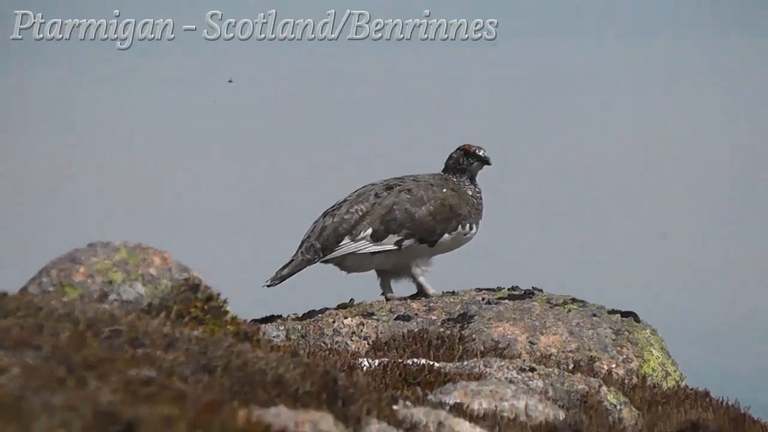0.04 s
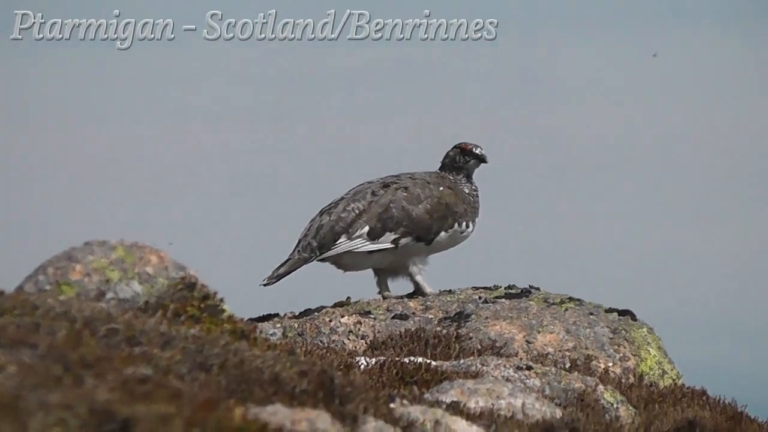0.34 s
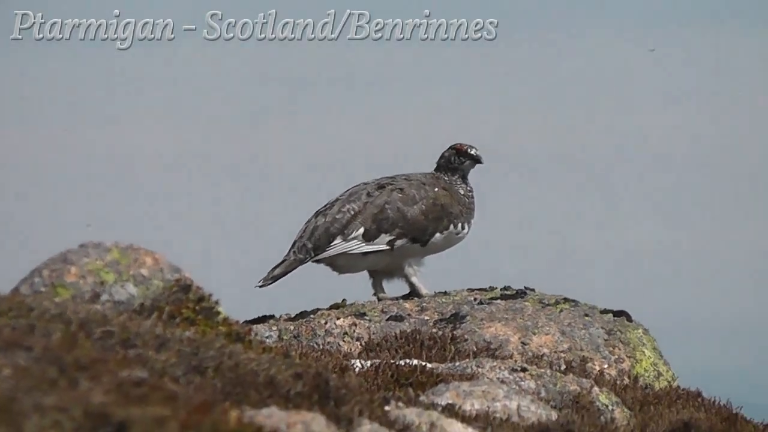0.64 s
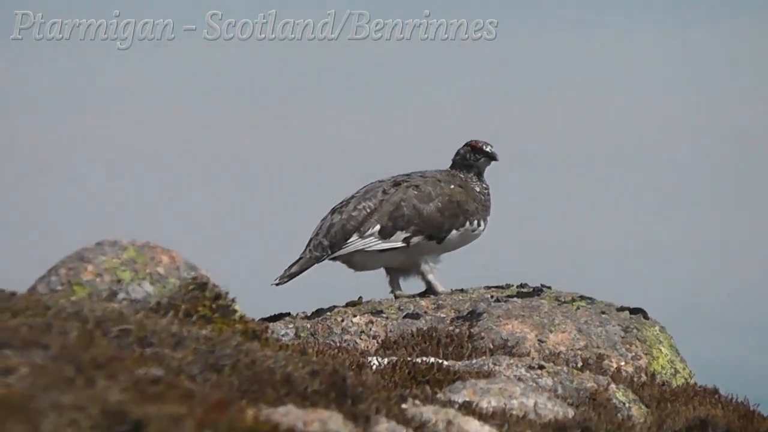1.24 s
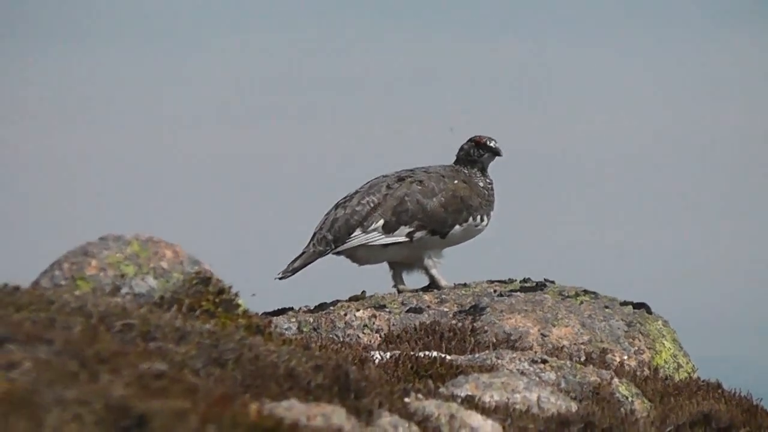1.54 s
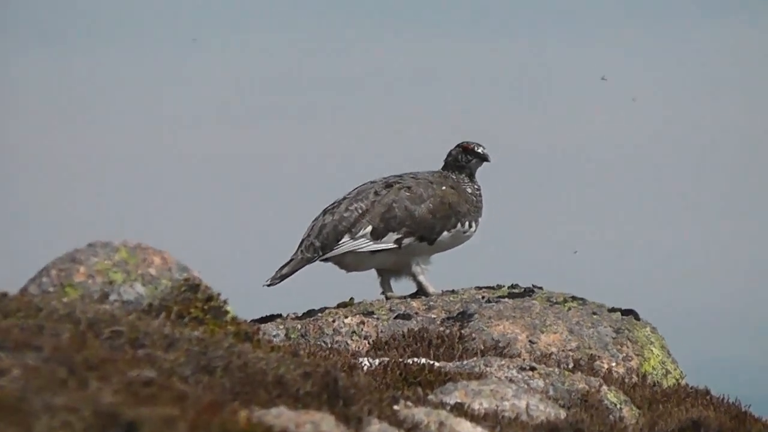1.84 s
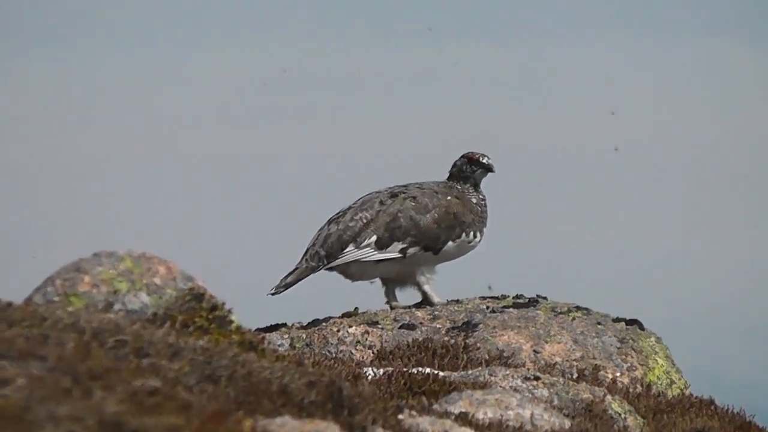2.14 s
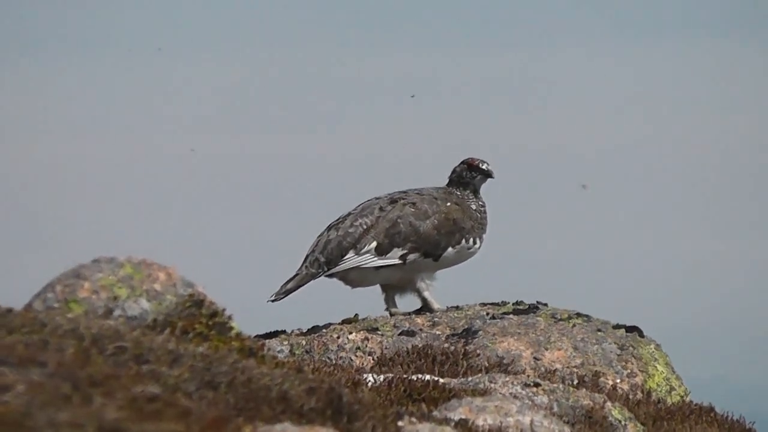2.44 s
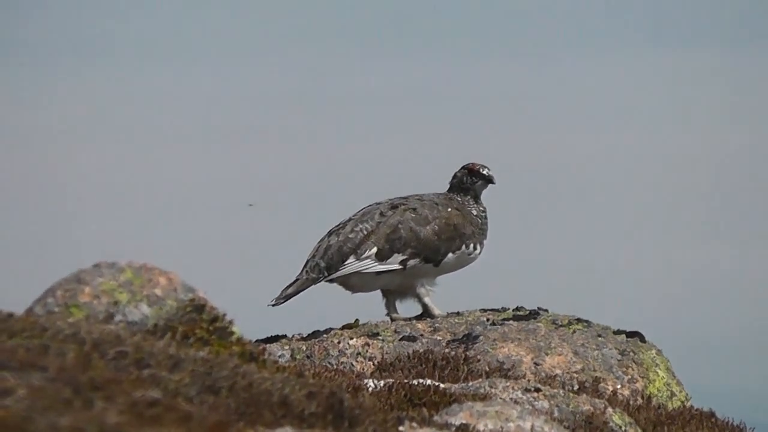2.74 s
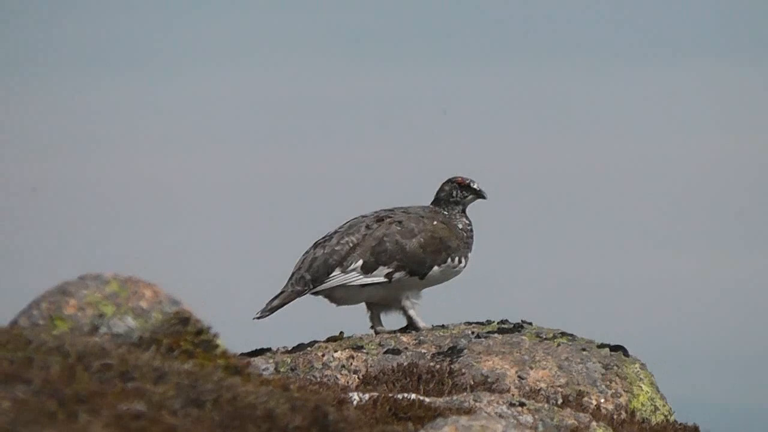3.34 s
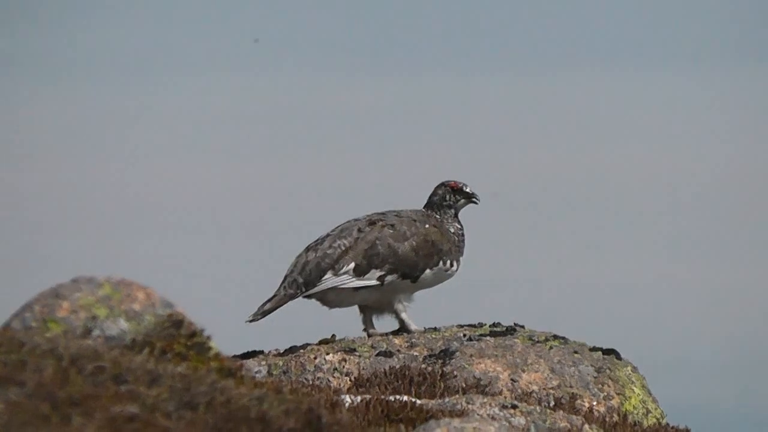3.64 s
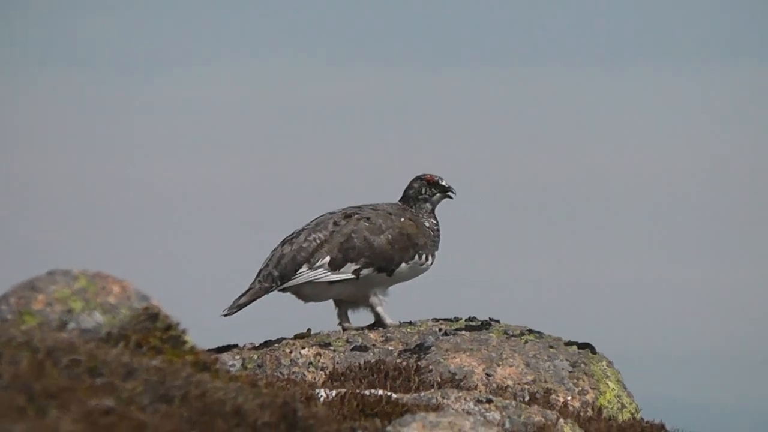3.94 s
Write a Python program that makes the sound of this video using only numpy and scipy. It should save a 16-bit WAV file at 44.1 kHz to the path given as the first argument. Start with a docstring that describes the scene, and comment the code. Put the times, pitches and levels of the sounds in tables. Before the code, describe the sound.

Wind buffets a close camera microphone on an open mountainside. A light puff comes and fades, then a gust builds into a low, fluttering rumble with soft thumps. Faint rushing air, hiss and camera motor buzz lie underneath.

```python
"""Wind buffets a camera's stereo microphone on an open mountainside: two light puffs, then a gust that
builds to the end. Turbulence right on the ports rumbles, flutters and tears; single eddies thump them.
Farther off, air rushes softly over the slope. Close up are the camera's own hiss and whirr,
spells of faint motor buzz and one small tick."""
import sys
import numpy as np
from scipy import signal
from scipy.fft import rfft, irfft, next_fast_len
from scipy.io import wavfile
from scipy.ndimage import uniform_filter1d, map_coordinates

SR = 44100
rng = np.random.default_rng(int(sys.argv[2]) if len(sys.argv) > 2 else 0)


def to_wav(sig):
    """Store sig (one row per channel, or 1-D mono) as 16-bit WAV at the path in sys.argv[1].

    Samples outside -1..1 are clipped; the rate is SR.
    """
    pcm = np.clip(np.atleast_2d(sig), -1, 1) * 32767
    pcm = np.round(pcm).astype(np.int16)
    wavfile.write(sys.argv[1], SR, pcm.T)  # frames by channels


N = 176400


def amp(db):
    """Decibels to gain."""
    return 10 ** (np.asarray(db) / 20)


def unit(x):
    """Scale to rms 1."""
    return x / np.sqrt(np.mean(x ** 2) + 1e-20)


def along(points, hz):
    """Read (frequency [Hz], value) points on a log axis."""
    freqs, values = np.transpose(points)
    return np.interp(np.log(hz + 1), np.log(freqs + 1), values)


def colour(points):
    """Gain against frequency, from (frequency [Hz], level [dB]) points."""
    return lambda hz: amp(along(points, hz))


def clock():
    """The time of each sample in seconds."""
    return np.arange(N) / SR


def curve(rows):
    """(time [s], value) points as one value per sample."""
    return np.interp(clock(), *np.transpose(rows))


def wobble(rate):
    """A smooth random curve, rate knots a second."""
    return map_coordinates(rng.standard_normal(int(N * rate / SR) + 4), [clock() * rate])


def filtered(x, response):
    """Shape x by a gain against frequency."""
    size = next_fast_len(N + SR // 2)
    return irfft(rfft(x, size) * response(np.fft.rfftfreq(size, 1 / SR)), size)[..., :N]


def rush(gain, alike, patchy_db=0):
    """Coloured stereo noise of rms 1 in random patches; alike is (frequency [Hz], left-right likeness)."""
    spectrogram = signal.stft(rng.standard_normal((2, N)), nperseg=512)[2]
    patches = uniform_filter1d(rng.standard_normal(spectrogram.shape[1:]), size=4, axis=0)
    patches = unit(uniform_filter1d(patches, size=20, axis=1))
    pair = signal.istft(spectrogram * amp(patchy_db * patches), nperseg=512)[1][:, :N]
    spread = lambda hz: np.arccos(np.clip(along(alike, hz), -1, 1)) / 2
    mid, side = filtered(pair, lambda hz: gain(hz) * np.array([np.cos(spread(hz)), np.sin(spread(hz))]))
    return unit(np.array([mid + side, mid - side]))


def steadied(x, size=1800):
    """Even out the chance swells of noise over size samples, so that the wind sets them."""
    power = uniform_filter1d(np.mean(x ** 2, axis=0), size)
    return x / np.sqrt(np.abs(power) + 1e-6)


def buffeting():
    """Turbulence on the ports: a rumble that rises in pitch with the wind, flutter and tearing in gusts."""
    # wind strength at the microphone (time [s], level [dB])
    wind_level = [(0.0, -77), (0.13, -62.5), (0.15, -65), (0.69, -67.5), (0.71, -64), (0.77, -66),
                  (0.9, -49), (0.99, -54.5), (1.24, -55), (1.68, -73.5), (1.88, -64), (1.97, -69),
                  (2.03, -56.5), (2.06, -65), (2.26, -47.5), (2.29, -42), (2.54, -60.5), (2.67, -38.5),
                  (2.7, -49.5), (2.74, -39), (2.82, -45.5), (2.94, -42), (2.97, -44), (3.06, -29.5),
                  (3.13, -34.5), (3.17, -34), (3.21, -42.5), (3.24, -31.5), (3.35, -42.5), (3.38, -35),
                  (3.43, -44.5), (3.52, -37.5), (3.58, -32), (3.65, -38.5), (3.72, -32), (3.74, -42),
                  (3.78, -35.5), (3.9, -37), (3.92, -32.5), (4.0, -37)]
    # rumble in strong wind, and the deeper one of slow, light wind (frequency [Hz], level [dB])
    strong_spectrum = [(20, -43), (35, -29), (50, -11.5), (65, -3), (95, 1), (150, -5.5), (210, -13.5),
                       (300, -29), (450, -43.5), (900, -73), (2000, -100)]
    light_spectrum = [(20, -24.5), (35, -8), (55, 1.5), (100, 0), (160, -8.5), (220, -19), (300, -23.5),
                      (600, -59), (2000, -100)]
    # flutter between the ports, and brighter tearing (frequency [Hz], level [dB])
    flutter_spectrum = [(40, -28), (90, -7.5), (160, 4), (240, -1.5), (320, -11.5), (430, -24.5),
                        (700, -44), (1200, -65), (3000, -100)]
    tear_spectrum = [(60, -13), (180, -2.5), (300, -4.5), (400, -4), (520, -10.5), (700, -17),
                     (1200, -36.5), (2000, -40), (4000, -86)]
    # tearing in the hardest gusts (time [s], level [dB])
    tear_level = [(2.2, -91), (2.95, -64), (3.06, -54.5), (3.13, -52), (3.19, -67), (3.25, -52),
                  (3.32, -75), (3.53, -70), (3.565, -50), (3.595, -39.5), (3.63, -57), (3.69, -56),
                  (3.725, -57), (3.77, -61), (3.85, -58), (3.89, -44), (3.945, -56), (3.972, -40.5),
                  (4, -65)]
    light_below_db, blend_db, gust_db = -44.5, 1.5, -36
    wind_db = curve(wind_level)
    strong_share = (1 + np.tanh((wind_db - light_below_db) / blend_db)) / 2
    rumble_alike = [(60, 1.0), (250, 0.48)]
    strong = np.sqrt(strong_share) * rush(colour(strong_spectrum), rumble_alike)
    light = np.sqrt(1 - strong_share) * rush(colour(light_spectrum), rumble_alike)
    rumble = steadied(strong + light) * amp(wind_db - 1.4 + 1.77 * wobble(35))
    flutter_db = gust_db - 9 + 1.3 * (wind_db - gust_db)  # grows faster than the wind
    flutter = steadied(rush(colour(flutter_spectrum), alike=[(100, -0.3), (250, -0.25), (500, -0.4)]))
    flutter *= amp(flutter_db + 2 * wobble(45))
    tear = rush(colour(tear_spectrum), alike=[(200, -0.2), (500, -0.92)])
    tear *= amp(curve(tear_level) + 1.7 * wobble(76))
    return rumble + flutter + tear


def air():
    """A soft, wide rush of wind over heather and rock; faint hollow tones come out as it swells."""
    # swell of the air over the slope (time [s], level [dB])
    air_level = [(0, -61), (.3, -62.5), (.65, -63.5), (1.05, -60.5), (1.4, -63.5), (1.65, -61),
                 (2.1, -64.5), (2.8, -63.5), (3.3, -64.5), (4, -62)]
    # its colour (frequency [Hz], level [dB])
    air_spectrum = [(20, -3.5), (35, -4.5), (60, 5), (130, 0), (250, -3), (500, -4.5), (700, -7.5),
                    (920, -14), (1150, -11), (1350, -13.5), (1600, -14.5), (2300, -29.5), (3000, -28),
                    (6000, -50)]
    # its stereo image (frequency [Hz], left-right likeness [-1 to 1])
    air_alike = [(60, -0.55), (230, -0.45), (400, -0.43), (800, -0.13), (1500, -0.32), (3000, 0.34)]
    # hollow tones (centre [Hz], half-width [Hz], level against the air [dB])
    hollows = [(545, 92, -14), (916, 98, -13)]
    hollow_swing_db = 2.4
    air_db = curve(air_level)
    out = rush(colour(air_spectrum), air_alike, patchy_db=1.9)
    for hz, width, db in hollows:
        band = rush(lambda f: 1 / (1 + ((f - hz) / width) ** 2), alike=[(700, -0.073)])
        swell = unit(amp(air_db - air_db.mean() + hollow_swing_db * wobble(9)))
        out += amp(db) * swell * band
    return amp(air_db + 0.49 * wobble(8)) * out


def camera_whirr():
    """A steady whirr in the resonances of the body that holds the microphone."""
    # body resonances (centre [Hz], half-width [Hz], relative level [dB])
    modes = [(1318, 62, 4), (1865, 69, 4), (2110, 175, 0), (2270, 180, 0), (3190, 33, -5.5),
             (3580, 150, -5), (4410, 152, -0.5), (4877, 115, 1), (5350, 540, -9.5), (6080, 194, -3.5),
             (6980, 550, -13)]
    whirr_db = -71.5
    power = lambda f: sum(amp(2 * db) / (1 + ((f - hz) / width) ** 2) ** 2 for hz, width, db in modes)
    level = amp(whirr_db + 0.34 * wobble(12))
    alike = [(1300, 0.52), (2300, 0.84), (4400, 0.98)]
    return level * rush(lambda f: np.sqrt(power(f)), alike, patchy_db=1.2)


def camera_hiss():
    """The noise floor: broad microphone hiss, an upper-middle band of it and a thin electronic whine."""
    # broad hiss, and the upper-middle band that dips as the gust builds (time [s], level [dB])
    broad_level = [(0, -72), (1, -72), (2, -72.5), (2.8, -72.5), (3.3, -70.5), (4, -70.5)]
    band_level = [(0, -80.5), (1, -80.5), (1.9, -80), (2.5, -83), (3.2, -93), (3.4, -82), (4, -81)]
    # their colours (frequency [Hz], level [dB])
    broad_spectrum = [(100, 1), (1000, 2.5), (2400, 2), (2800, -6.5), (3300, -3.5), (4500, 1.5), (7000, -5),
                      (9000, -6), (12000, -10.5), (15600, -12.5)]
    band_spectrum = [(1200, -25), (2400, 0.5), (2800, -3.5), (3500, 0), (4200, -5.5), (6000, -32)]
    # stereo image of both (frequency [Hz], left-right likeness [-1 to 1])
    hiss_alike = [(1000, 0.34), (4400, .85), (8000, 0.59), (15000, 0.32)]
    whine_hz, whine_db = 12500, -98
    broad_db = curve(broad_level) + 0.25 * wobble(11)
    broad = amp(broad_db) * rush(colour(broad_spectrum), hiss_alike, patchy_db=1.0)
    band = amp(curve(band_level)) * rush(colour(band_spectrum), hiss_alike)
    whine = amp(whine_db) * np.sin(2 * np.pi * whine_hz * clock())
    return broad + band + whine


def motor_buzz():
    """A small motor inside the camera moves in regular steps, each a short rasp."""
    # spells of running (start [s], end [s], level [dB])
    spells = [(0, 0.25, -74.5), (0.256, 0.708, -79), (0.713, 1.07, -72.5), (1.07, 1.2, -76),
              (1.39, 1.869, -78), (3.37, 3.903, -71.5)]
    # rasp of a step (frequency [Hz], level [dB])
    step_spectrum = [(300, -29), (900, -0.5), (1150, -13), (1370, 10.5), (1620, -28), (1870, 0.5),
                     (2400, 3.5), (2950, -10), (3600, -2), (4100, -15), (4550, -8), (4900, 0), (5300, -3.5),
                     (5700, -16), (6150, -7.5), (6500, -27), (8000, -23), (15000, -42)]
    step_hz, first_step_s, rise_s, decay_s = 50, 0.0015, 0.00066, 0.002
    t = clock()
    age = (t - first_step_s) % (1 / step_hz)
    steps = unit((1 - np.exp(-age / rise_s)) * np.exp(-age / decay_s))
    running = sum(amp(db) * ((t >= start) & (t < end)) for start, end, db in spells)
    return running * steps * rush(colour(step_spectrum), alike=[(1000, 0.31), (3000, 1.0)])


def eddies():
    """Each eddy is one smooth dip of pressure that reaches the two ports in turn."""
    # hits on the ports (time [s], peak [dB], centre [Hz], left over right [dB])
    hits = [(.118, -50.5, 119, 2), (0.462, -55, 303, -1), (0.714, -53, 89, -5), (.899, -40, 118, 0),
            (.941, -48, 95, 0), (1.173, -48, 92.5, -8), (1.345, -50.5, 79, 0), (1.452, -54.5, 88.5, 0),
            (1.870, -46, 243, 6), (2.025, -48, 80, -2), (2.421, -41, 90.5, 0), (3.056, -22, 87.5, -5),
            (3.169, -26.5, 105, 5), (3.574, -30.5, 96.5, 4), (3.596, -24, 178, 12.5), (3.724, -25, 157, -3),
            (3.927, -22, 118, 8.5)]
    port_lag_s = 0.0007
    sides = np.array([[1], [-1]])
    out = np.zeros((2, N))
    for at, db, hz, pan_db in hits:
        phase_squared = (np.pi * hz * (clock() - at - sides * port_lag_s / 2)) ** 2
        dip = (2 * phase_squared - 1) * np.exp(-np.minimum(phase_squared, 50))
        out += amp(db + sides * pan_db / 2) * dip
    return out


def tick():
    """A close, dry click on the camera that dies within milliseconds."""
    # the tick and its rebound (time [s], level before colouring [dB])
    contacts = [(3.474, -38), (3.4756, -41.5)]
    # colour of the click (frequency [Hz], gain [dB])
    tick_spectrum = [(300, -24), (750, -7), (1200, 4.5), (2500, 0), (4000, 5), (7000, -4), (8500, -22),
                     (11000, -24), (15000, -40)]
    decay_s = 0.00092
    t = clock()
    envelope = sum(amp(db) * (t >= at) * np.exp(-np.abs(t - at) / decay_s) for at, db in contacts)
    burst = envelope * rush(np.ones_like, alike=[(3000, 0.94)])
    return filtered(burst, colour(tick_spectrum))


def scene():
    """Wind on the ports, over the air of the slope and the camera's own noises."""
    return buffeting() + air() + camera_whirr() + camera_hiss() + motor_buzz() + eddies() + tick()


def record(dry):
    """The camera keeps nothing above its band limit."""
    top_hz = 15700
    return filtered(dry, lambda hz: hz < top_hz)


dry = scene()
out = record(dry)
to_wav(out)
```